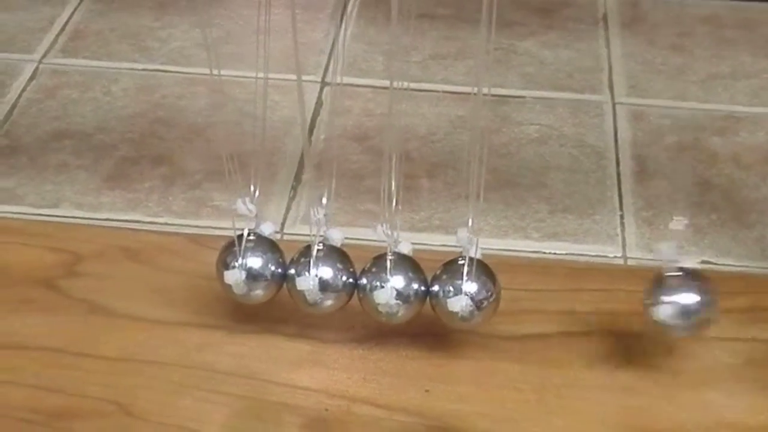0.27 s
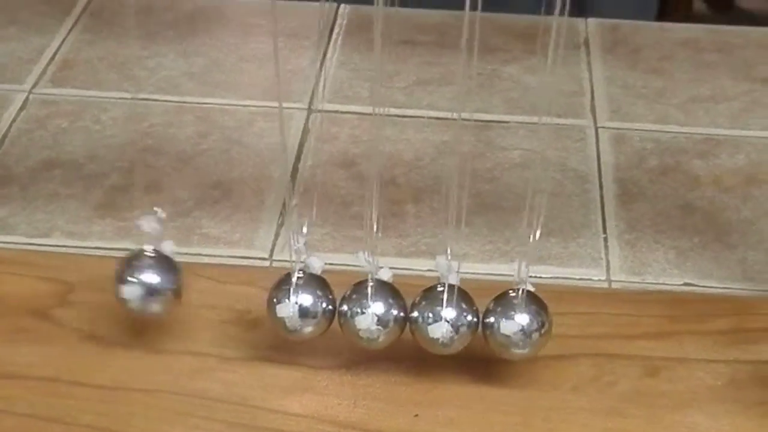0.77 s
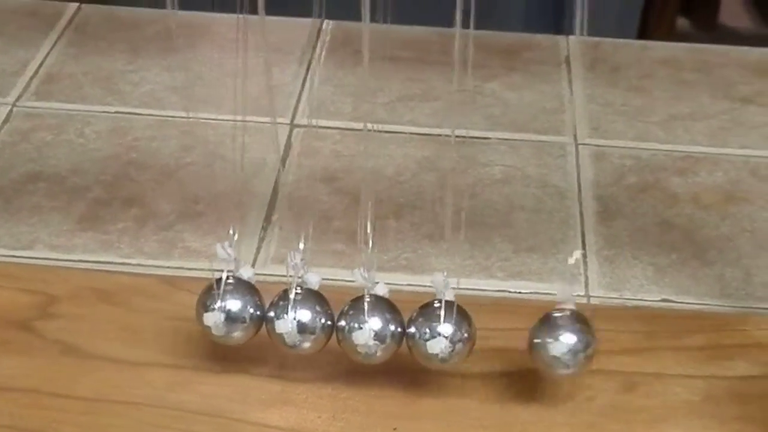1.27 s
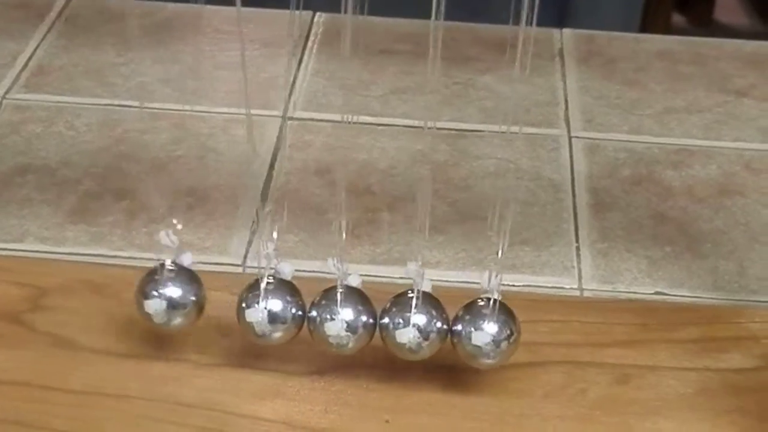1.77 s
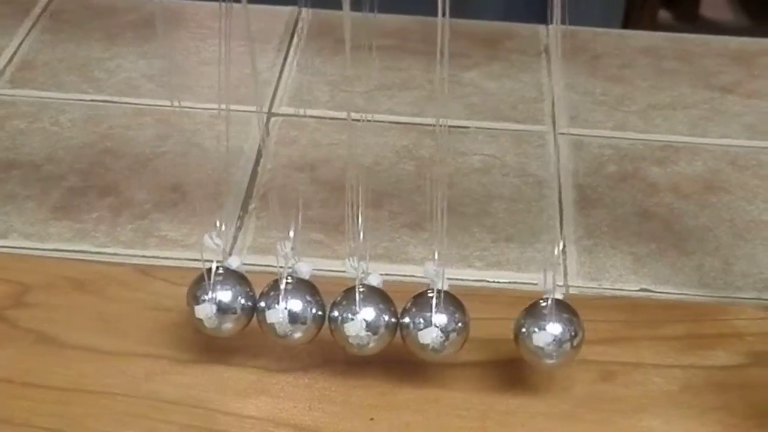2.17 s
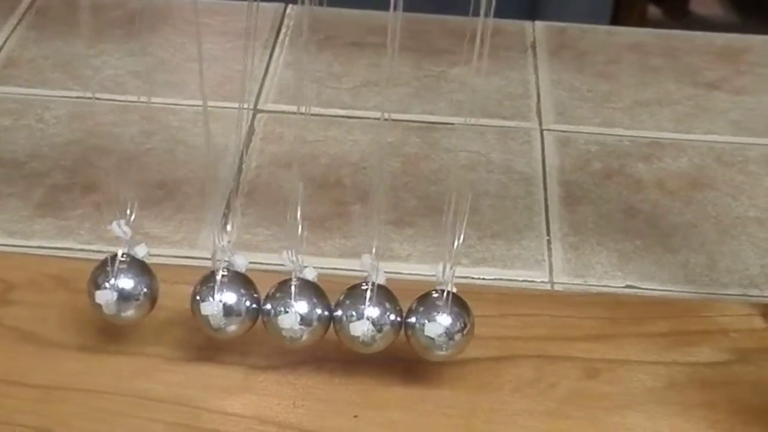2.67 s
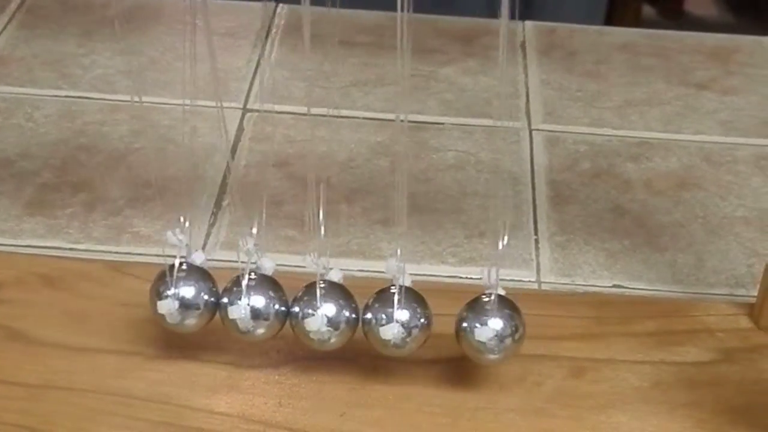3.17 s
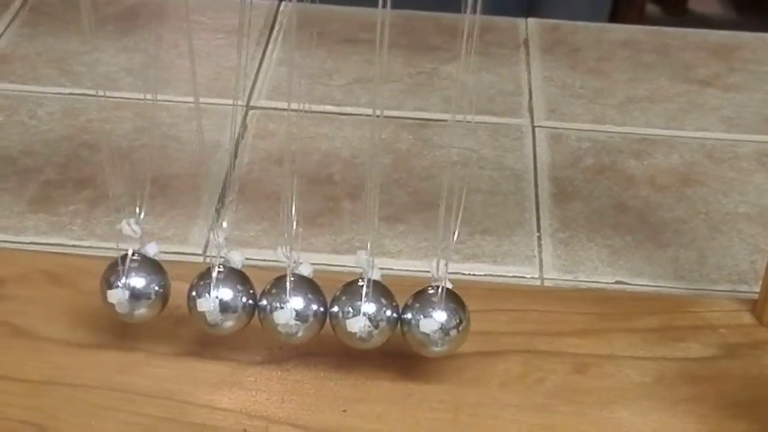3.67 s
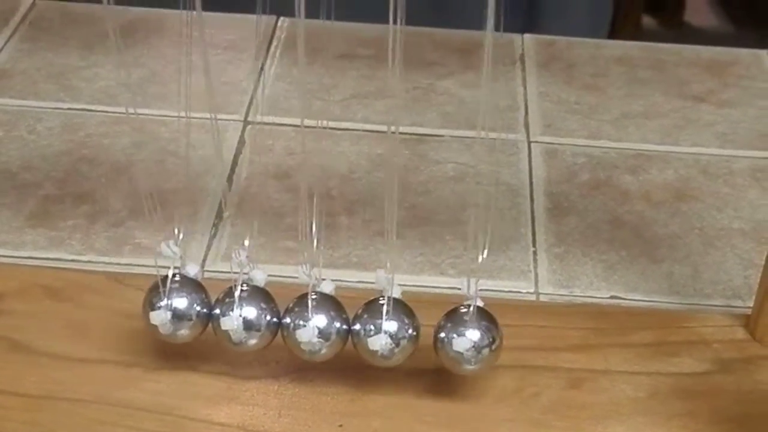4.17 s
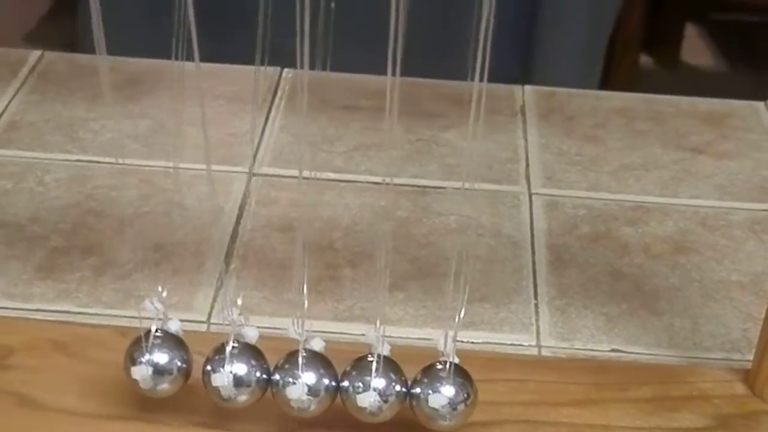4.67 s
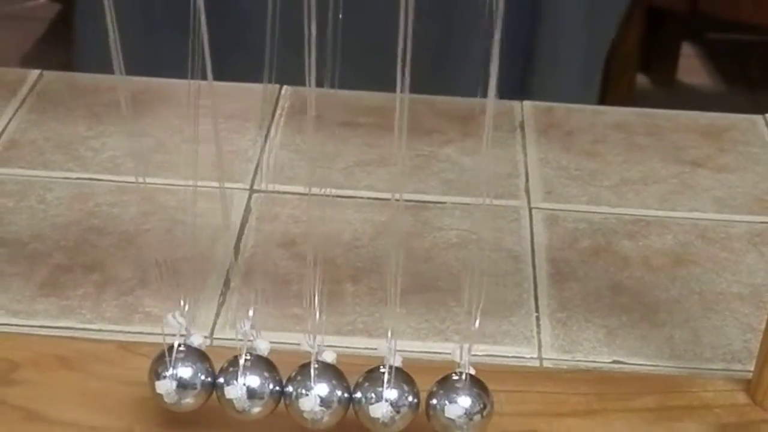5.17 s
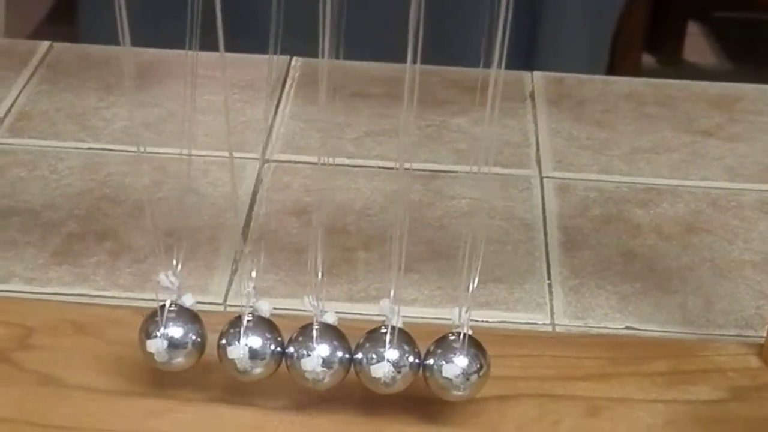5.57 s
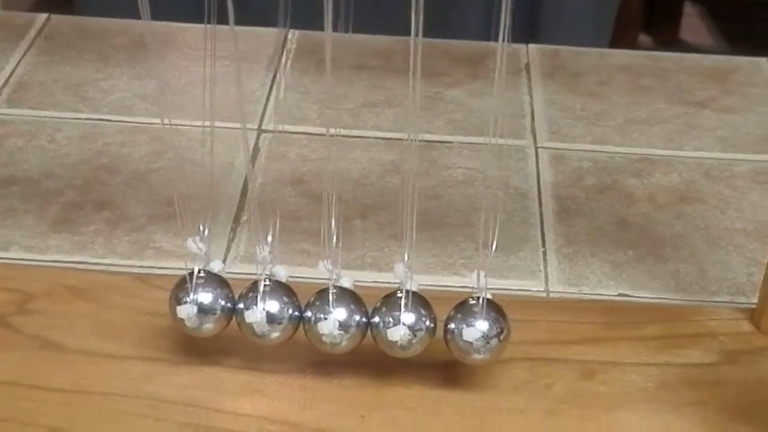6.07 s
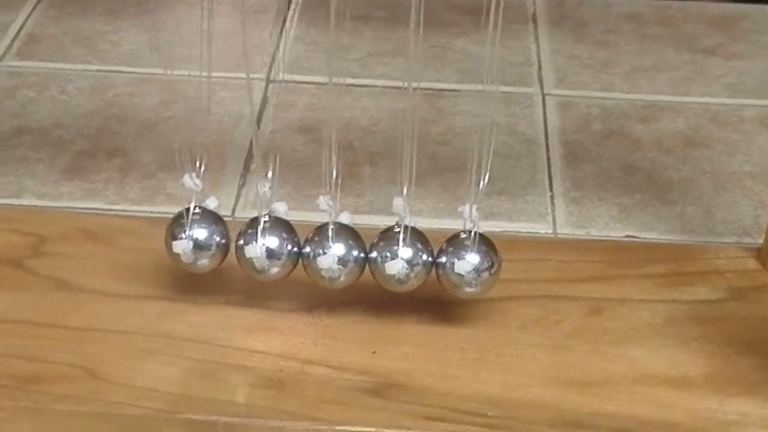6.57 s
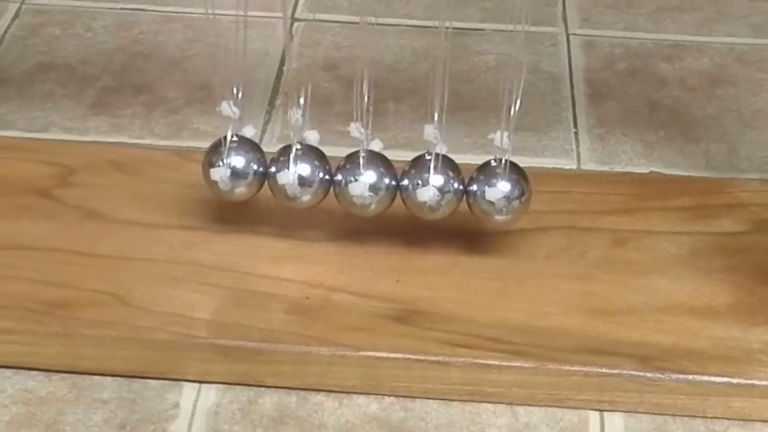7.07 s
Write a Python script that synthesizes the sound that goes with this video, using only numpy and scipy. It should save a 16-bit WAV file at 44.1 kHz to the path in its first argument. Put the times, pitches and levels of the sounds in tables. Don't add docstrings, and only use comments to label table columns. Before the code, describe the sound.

A row of small steel balls swings and clicks, about two strikes a second, each a single dry snap or a quick stutter of two to four contacts. Loud at first with a brief hard-walled reflection, they shrink to weak ticks. A steady low hum with airy rumble lies beneath; late on come very faint whistles, thread rustles and a tiny creak. Heard close on a simple camera microphone whose level ducks after the early hits.

```python
import sys
import numpy as np
from scipy import signal
from scipy.fft import rfft, irfft
from scipy.io import wavfile
from scipy.ndimage import uniform_filter1d, map_coordinates

SR = 44100
rng = np.random.default_rng(int(sys.argv[2]) if len(sys.argv) > 2 else 0)


def transcribe(u):
    v = np.clip(np.atleast_2d(u).T, -1, 1)
    q = np.round(v * 32767).astype(np.int16)
    wavfile.write(sys.argv[1], SR, q)


def ratio_of_db(decibels):
    return 10 ** (np.asarray(decibels, float) / 20)


N = 322812

# first contact in seconds, its peak in dB, strength the walls hear in dB,
# rebound in dB, hardness in dB.
SWINGS = [(.3739, -23, -20.5, 1, 3), (0.8735, -20, -23.5, -14.5, 2), (1.3675, -24.5, -27, -11, .5),
          (1.8649, -30, -31.5, 3, 0.5), (2.3524, -32, -34.5, -14, 0), (2.8514, -35.5, -37, -3, 0),
          (3.3224, -37.5, -39, -13, -1.5), (3.8321, -37.5, -40, -5, -1), (4.2934, -37, -39, -14, -2.5),
          (4.7952, -36.5, -42.5, -15.5, -0.5), (5.245, -40, -42.5, -3, -4),
          (5.7481, -44.5, -42.5, -7, -3.5), (6.1815, -42.5, -44.5, 1.5, -4.5),
          (6.6884, -46, -42.5, -11, -4), (7.1057, -52, -52.5, -12, -2.5)]
# time in seconds, peak in dB.
FOLLOWS = [(.8746, -25.4), (.8758, -22.3), (.8794, -23.2), (1.3683, -32.6), (1.3738, -35.3), (1.8729, -33),
           (1.8748, -28.8), (2.3556, -32.9), (2.3609, -35.9), (2.8561, -34.2), (2.8582, -35.4),
           (2.8627, -35.7), (3.3338, -41.4), (3.3373, -42.1), (3.833, -37.8), (3.8406, -43.9),
           (4.298, -47.2), (5.2534, -47.6), (5.2616, -48.9), (5.749, -44.5), (5.7549, -52.1),
           (6.1907, -51.6), (6.6953, -49.7), (7.1128, -57.5)]
# time in seconds, peak in dB.
SMALL_TICKS = [(.3137, -61.5), (.7962, -52.9), (.8243, -55.8), (1.2861, -56.7), (1.3177, -49.7), (1.6885, -63.3),
               (1.7315, -59.6), (1.8461, -62.6), (2.8254, -67.4), (3.7652, -68.7), (4.129, -68.4),
               (5.0763, -53.9), (6.016, -65)]
# frequency in Hz, width in Hz, level in dB.
BODY = [(1500, 830, -20.5), (2280, 690, -16), (3320, 2000, -13), (5070, 300, -10.5), (5550, 420, -8),
        (8680, 1100, -9), (11900, 2200, -13.5), (12900, 1300, -9), (14800, 1100, -13.5)]
# frequency in Hz, time to fall 60 dB in seconds.
TILE_DECAY = [(2000, .33), (4000, 0.4), (6000, 0.42), (8000, 0.43), (10500, .3), (14000, 0.091)]
# frequency in Hz, level in dB.
TILE_COLOUR = [(800, -33.5), (1800, -8), (3000, -7), (4500, -6.5), (5800, 1), (7000, 2.5), (8200, -1),
               (9500, -4), (11000, -12), (13000, -10), (16000, -13)]
# first step in seconds, then a list of step number and peak in dB.
LENS_SPELLS = [
    (.0404, [(0, -63.8), (2, -60.3), (17, -54.9), (18, -57.5), (26, -58.4)]),
    (3.8128, [(0, -64.3), (7, -65.2), (21, -54.2), (27, -63), (34, -62), (35, -62.2), (37, -56.2), (40, -57.9), (42, -66), (46, -57.8), (49, -61.2), (52, -63.8)]),
]
LENS_TURNS = [.04, 1.174, 7.08]
# start in seconds, length in seconds, level in dB, frequency in Hz.
THREAD_RUBS = [
    (.236, 0.0082, -72, 5900),
    (5.56, 0.21, -79.5, 7150),
    (6.8, 0.19, -85.5, 7500),
]
# start in seconds, length in seconds, level in dB, frequency in Hz.
BEARING_SQUEAKS = [
    (5.10, .07, -73.5, 1630),
    (5.76, .33, -73.5, 2330),
    (6.95, .2, -73, 2370),
]
# start in seconds, level in dB, pulses per second, number of pulses.
CREAKS = [
    (0.2422, -62, 370, 5),
    (6.351, -60, 290, 4),
]
# frequency in Hz, width in Hz, level in dB.
HOUSING = [(1500, 230, 1), (2000, 280, 1.5), (2560, 160, -1), (3880, 430, -1)]
# frequency in Hz, rms level in dB.
MOTOR_TONES = [(59.4, -63.5), (77.6, -61), (119.9, -61.5), (170.5, -43), (201.9, -48.5), (239.8, -54),
               (265, -68.5), (388, -63), (432.1, -63.5), (465.4, -68.5)]
# frequency in Hz, level in dB per Hz.
AIR_RUMBLE = [(15, -54), (30, -19.5), (60, -18.5), (105, -13.5), (155, -4.5), (230, -9), (320, -11),
              (500, -19.5), (900, -31.5), (1500, -38.5), (2750, -47.5), (3500, -56.5), (7000, -58.5),
              (9000, -70)]
# frequency in Hz, level in dB per Hz.
HISS = [(2000, -32), (8000, -8), (11500, -17), (13500, 0.5), (14500, 8.5), (15600, 5), (15800, -10.5),
        (16600, -32.5)]
# time in seconds, depth in dB.
DUCKS = [
    (.3755, 12),
    (.874, 4.5),
    (1.37, 5),
    (1.87, 1.3),
]
# frequency in Hz, step in dB.
DETAIL_STEP = [(1500, -116), (3000, -103), (4500, -100), (8000, -99), (12000, -99), (15500, -100)]
FULL_DETAIL = [.222, 2.68, 3.785, 4.15, 4.42, 7.19]

RING_HZ, SOFT_DB, SAG_HZ_PER_DB = 7070, -38.5, 72.5
REBOUND_DB, SMALL_WALL_DB = -15, -3
SHARED = .45
LENS_RATE, LENS_HZ, LENS_LOW_HZ = 15, 6500, 3850
DUCK_FAST_S, DUCK_SLOW_S, DUCK_SLOW_SHARE = .0025, .05, .22
HOLD_S_PER_DB, RECOVER_DB_PER_S = .02, 26


def unit(x):
    return x / np.sqrt(np.mean(x ** 2) + 1e-20)


def along(points, hz):
    f, v = np.transpose(points)
    return np.interp(np.log(hz + 1), np.log(f + 1), v)


def wobble(rate):
    knots = rng.standard_normal(int(N * rate / SR) + 4)
    return map_coordinates(knots, [np.arange(N) * rate / SR])


def rush(spectrum, patchy_db):
    hz, _, z = signal.stft(rng.standard_normal(N), SR, nperseg=4096)
    patches = unit(uniform_filter1d(rng.standard_normal(z.shape), size=30, axis=0))
    gain_db = patchy_db * patches + along(spectrum, hz)[:, None]
    return unit(signal.istft(z * ratio_of_db(gain_db), nperseg=4096)[1][:N])


def resonance(f, hz, width):
    return 1j * f * width / (hz * hz - f * f + 1j * f * width)


def modes(f, table, scatter_db=0):
    hz, width, db = np.transpose(table)
    sign = (-1.) ** np.arange(len(hz))
    return np.sum(sign * ratio_of_db(db + scatter_db) * resonance(f[:, None], hz, width), axis=-1)


def place(rows, sounds, delay=0):
    out = np.zeros(N + 2 * SR)
    for row, sound in zip(rows, sounds):
        out[round((row[0] + delay) * SR):][:len(sound)] += sound
    return out[:N]


def balls():
    blows, small = contacts()
    rows = blows + small
    s, db = np.transpose(rows)[:2, :, None]
    swing_s, _, wall_db, _, hardness_db = np.transpose(SWINGS)
    swing = np.abs(s - swing_s).argmin(axis=1)
    own = swing[:len(blows)]
    summed_db = 10 * np.log10(np.bincount(own, ratio_of_db(2 * db[:len(blows), 0])))
    share_db = np.r_[(wall_db - summed_db)[own], np.full(len(small), SMALL_WALL_DB)]
    push = pushes(np.interp(s, swing_s, hardness_db))
    sent = ratio_of_db(db + share_db[:, None] + 5.0) * irfft(push, axis=1)
    direct = place(rows, clicks(rows, push))
    return direct + ratio_of_db(10.5) * place(rows, room(sent, swing), delay=0.0045)


def contacts():
    firsts = [(s, db, RING_HZ, rebound_db) for s, db, _, rebound_db in np.array(SWINGS)[:, :4]]
    follows = [(s, db, RING_HZ - SAG_HZ_PER_DB * max(SOFT_DB - db, 0), REBOUND_DB) for s, db in FOLLOWS]
    small_ticks = [(s, db, RING_HZ, REBOUND_DB) for s, db in SMALL_TICKS]
    return sorted(firsts + follows), sorted(small_ticks + lens_ticks())


def lens_ticks():
    ticks = []
    for start, spell in LENS_SPELLS:
        for step, db in spell:
            s = start + step / LENS_RATE
            turning = np.isclose(s, LENS_TURNS, atol=.01).any()
            ticks.append((s, db, LENS_LOW_HZ if turning else LENS_HZ, REBOUND_DB))
    return ticks


def pushes(hardness_db):
    x = np.fft.rfftfreq(1024, 1 / SR) / (11500 * ratio_of_db(hardness_db))
    return 1 / (1 + 1.3j * x - x ** 2) ** 3


def clicks(rows, push):
    _, db, ring_hz, rebound_db = np.transpose(rows)[:, :, None]
    t, f = np.arange(1024) / SR, np.fft.rfftfreq(1024, 1 / SR)
    body = modes(f, BODY, rng.normal(0, 2.5, (len(rows), 1, len(BODY))))
    ring = resonance(f, ring_hz, 1800) ** 3
    rebound = ratio_of_db(rebound_db) * np.exp(-2j * np.pi * f * 3 / ring_hz)
    scatter = rng.standard_normal((len(rows), len(t)))
    near = ratio_of_db(-20 - 60 * t / 0.02) * (t > .0006) * scatter
    sound = irfft((ring + body) * push * (1 + rebound + rfft(near, axis=1)), axis=1)
    return ratio_of_db(db) * sound / np.abs(sound).max(axis=1, keepdims=True)


def room(sounds, leader):
    hz, t, z = signal.stft(rng.standard_normal((len(sounds), SR // 2)), SR, nperseg=256)
    fade_db = along(TILE_COLOUR, hz)[:, None] - 60 * t / along(TILE_DECAY, hz)[:, None]
    tail = signal.istft(z * ratio_of_db(fade_db), SR, nperseg=256)[1]
    age = np.arange(tail.shape[1]) / SR
    lumps = unit(uniform_filter1d(rng.standard_normal(tail.shape), size=40, axis=1))
    echoes = ratio_of_db(3.5 * lumps * np.exp(-age / .04))
    tail = tail * echoes * (1 - np.exp(-age / 0.0018))
    tail = tail / np.linalg.norm(tail, axis=1, keepdims=True)
    mixed = np.sqrt(SHARED) * tail[leader] + np.sqrt(1 - SHARED) * tail[::-1]
    return signal.fftconvolve(sounds, mixed, axes=1)


def threads():
    return burst(THREAD_RUBS, width=2400, grain_rate=400, grain_db=4)


def bearings():
    return burst(BEARING_SQUEAKS, width=200, grain_rate=25, grain_db=2)


def burst(rows, width, grain_rate, grain_db):
    t, f = np.arange(SR // 2) / SR, np.fft.rfftfreq(SR // 2, 1 / SR)
    sounds = []
    for _, length, db, hz in rows:
        noise = unit(irfft(rfft(rng.standard_normal(len(t))) * resonance(f, hz, width) ** 2))
        grains = ratio_of_db(grain_db * wobble(grain_rate)[:len(t)])
        swell = np.sin(np.pi * np.clip(t / length, 0, 1)) ** .6
        sounds.append(ratio_of_db(db) * noise * grains * swell)
    return place(rows, sounds)


def creaks():
    ring = irfft(modes(np.fft.rfftfreq(1024, 1 / SR), HOUSING))
    ring = ring / np.abs(ring).max()
    pulses = []
    for s, db, rate, count in CREAKS:
        for k in range(round(count)):
            pulses.append((s + k / rate, db + rng.normal(0, 1.4)))
    return place(pulses, [ratio_of_db(db + 10.5) * ring for _, db in pulses])


def appliance():
    t = np.arange(N) / SR
    tones = np.zeros(N)
    for hz, db in MOTOR_TONES:
        strength = ratio_of_db(db + 4 + 0.66 * wobble(2.3))
        cycles = hz * t + rng.random() + 0.019 * wobble(2)
        tones += strength * np.sin(2 * np.pi * cycles)
    air = ratio_of_db(-43.0 + 0.57 * wobble(2.8)) * rush(AIR_RUMBLE, patchy_db=0.94)
    return tones + air


def gain_control():
    s, depth_db = np.transpose(DUCKS)[:, :, None]
    age = np.clip(np.arange(N) / SR - s, 0, None)
    fast = (1 - DUCK_SLOW_SHARE) * np.exp(-age / DUCK_FAST_S)
    slow = DUCK_SLOW_SHARE * np.exp(-age / DUCK_SLOW_S)
    drop = 1 - fast - slow
    climb_db = RECOVER_DB_PER_S * np.clip(age - HOLD_S_PER_DB * depth_db, 0, None)
    return ratio_of_db(np.minimum(climb_db - depth_db * drop, 0).min(axis=0))


def drop_quiet(x):
    hz, t, z = signal.stft(x, SR, "cosine", nperseg=2048)
    size = np.abs(z) / ratio_of_db(along(DETAIL_STEP, hz)[:, None])
    keep = np.floor(size + .33) / (size + 1e-9)
    everything = np.abs(t - np.c_[FULL_DETAIL]).min(axis=0) < .016
    return signal.istft(z * np.where(everything, 1, keep), SR, "cosine", nperseg=2048)[1][:, :N]


def scene():
    return (balls() + threads() + bearings() + creaks() + appliance())[None]


def band_limit(x):
    return signal.sosfilt(signal.butter(12, 16660, fs=SR, output="sos"), x)


def record(dry):
    hiss = ratio_of_db(-80) * rush(HISS, patchy_db=.5)
    x = (dry + hiss) * gain_control()
    x = drop_quiet(x) + ratio_of_db(-100) * rng.standard_normal(N)
    return band_limit(x)


dry = scene()
out = record(dry)
transcribe(out)
```